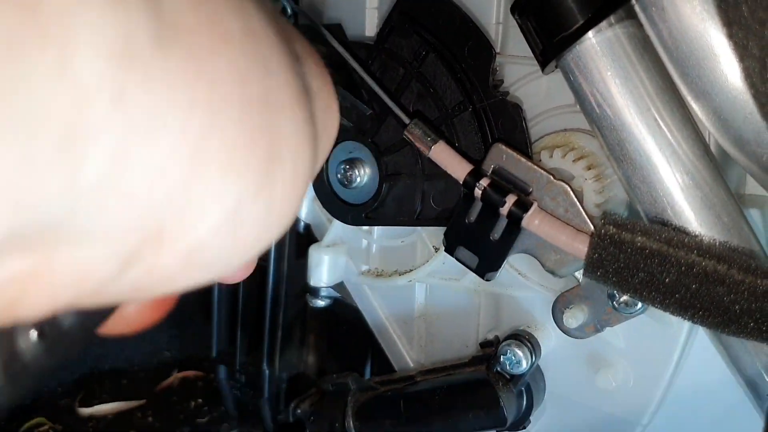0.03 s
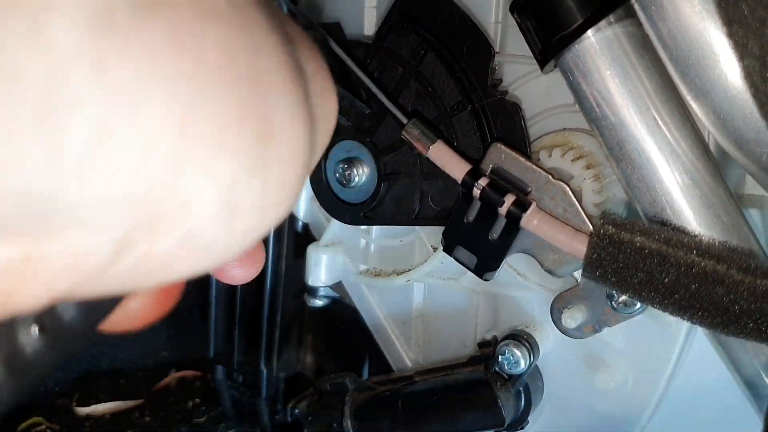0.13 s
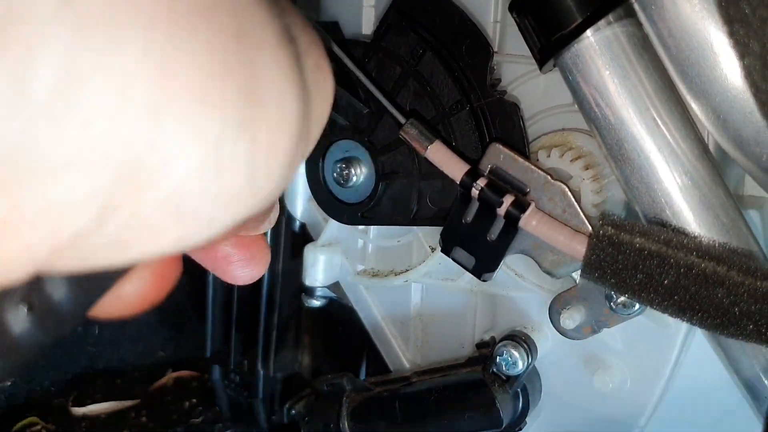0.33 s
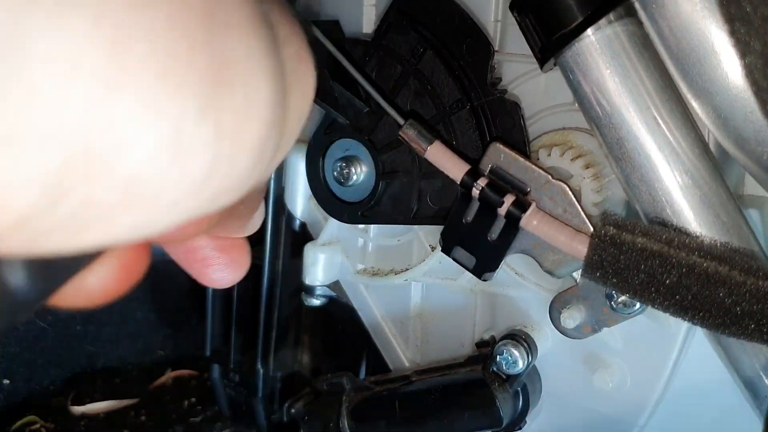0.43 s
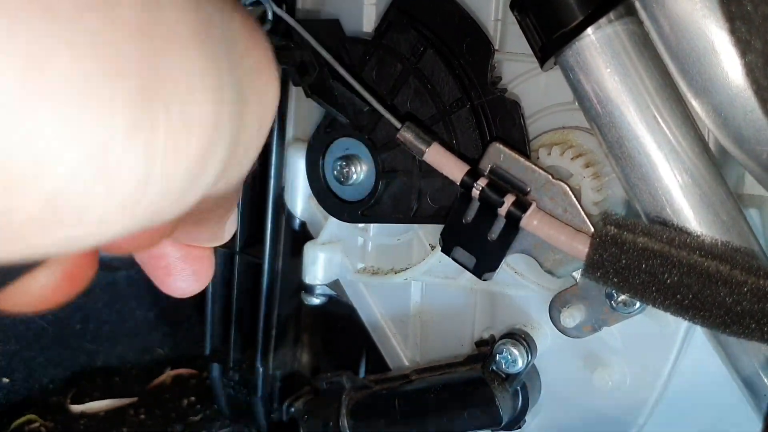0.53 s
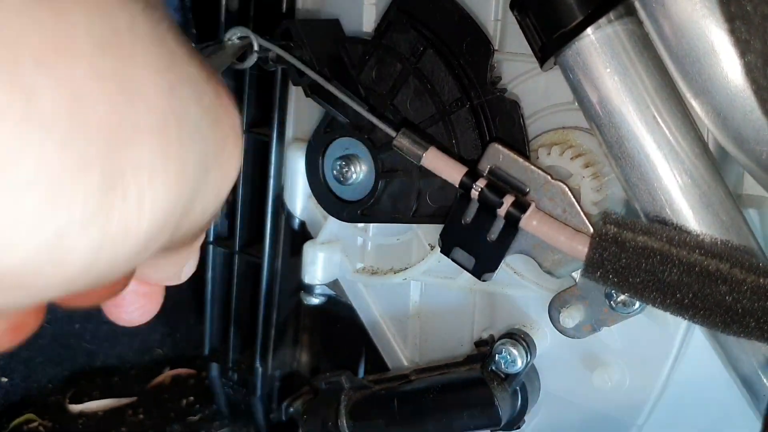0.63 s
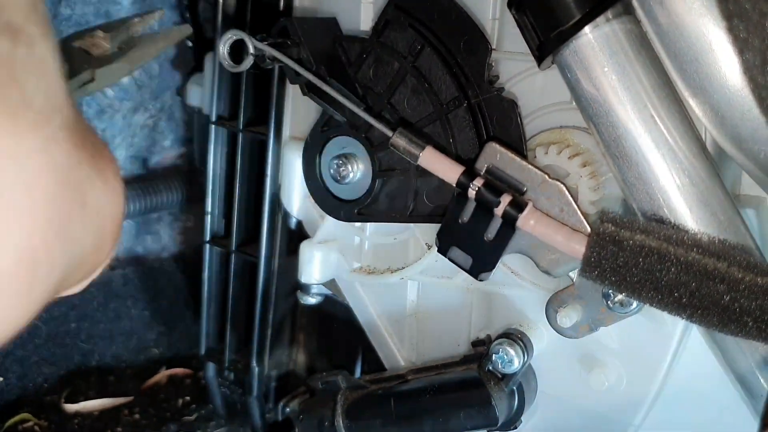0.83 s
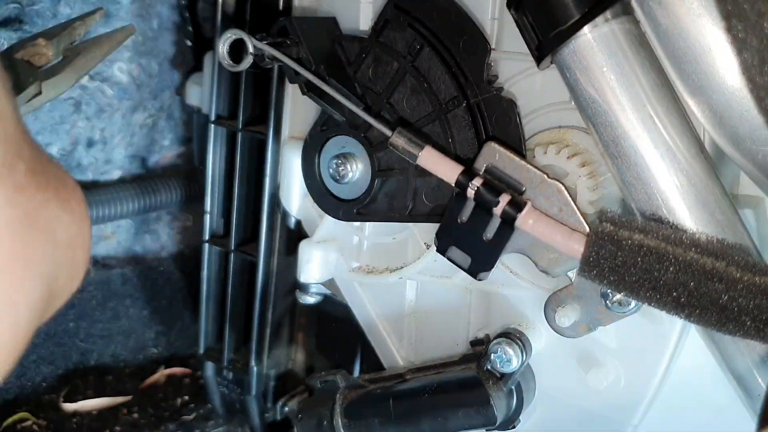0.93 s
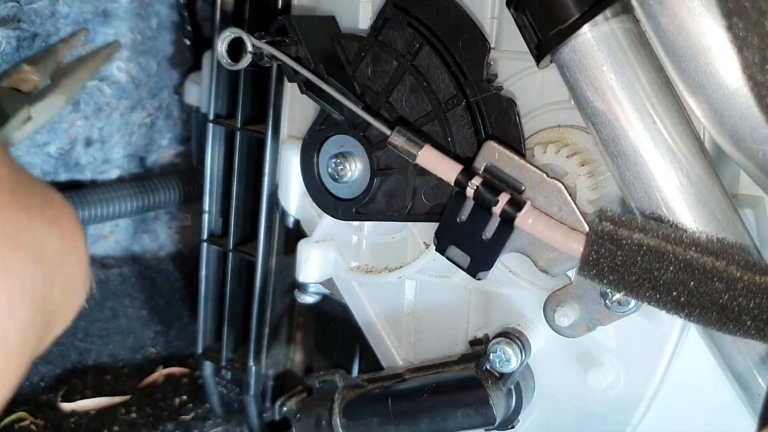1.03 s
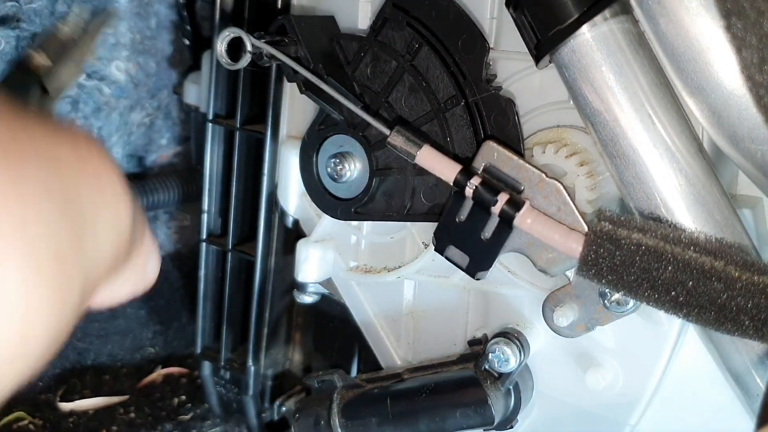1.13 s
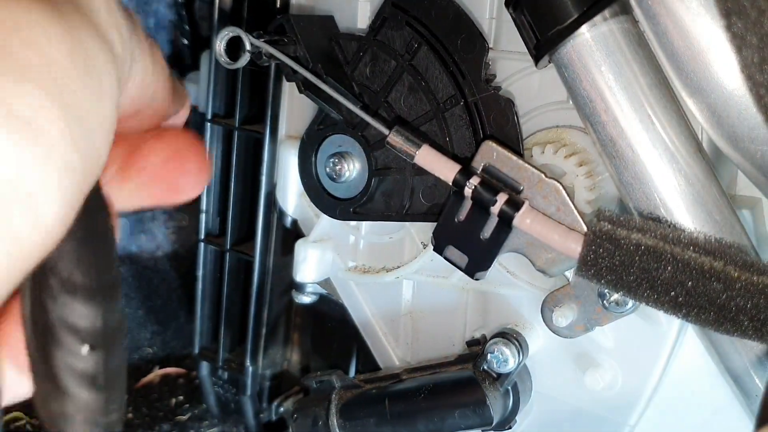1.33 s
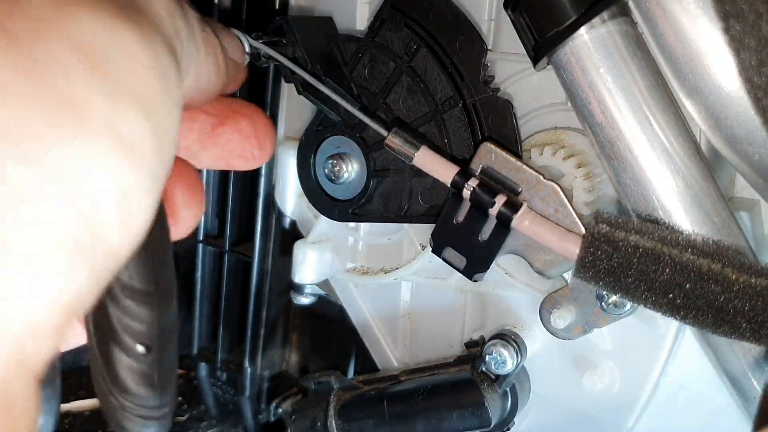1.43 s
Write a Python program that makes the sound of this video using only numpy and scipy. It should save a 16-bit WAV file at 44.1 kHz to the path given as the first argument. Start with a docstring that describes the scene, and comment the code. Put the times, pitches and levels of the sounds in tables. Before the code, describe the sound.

Close up inside a small, quiet car, pliers click sharply on a steel cable, rub softly along a panel, and the freed cable end chatters against hollow plastic. Faint ticks and a low hand rumble accompany the work.

```python
"""Pliers on a car door cable

Inside a small, dead car cabin, stereo microphone close to the door. Pliers work a thin steel cable
off a lever: the jaws slip with a sharp snap, something rubs along the panel, then the cable end comes
free and rattles on plastic. Snap and rattle ring the panel; the hand adds faint ticks and a low rumble."""
import sys
import numpy as np
from scipy import signal
from scipy.fft import rfft, irfft
from scipy.io import wavfile
from scipy.ndimage import uniform_filter1d

SR = 44100
rng = np.random.default_rng(int(sys.argv[2]) if len(sys.argv) > 2 else 0)


def materialize(psi):
    """Save the field psi as 16-bit PCM at rate SR to the path in sys.argv[1].

    A 1-D psi becomes a single channel; in a 2-D psi each row is a channel.
    """
    bounded = np.clip(np.atleast_2d(psi).T, -1, 1)
    quanta = np.round(bounded * 32767).astype(np.int16)
    wavfile.write(sys.argv[1], SR, quanta)


N = 66150

# balance of the two microphone ports (frequency [Hz], left minus right [dB])
MIC_BALANCE = [(100, 2), (350, 2.5), (600, -2), (1200, 0.5), (1900, 1.5), (2600, 7), (4500, 7),
               (9000, 11.5), (12500, 5.5), (15000, 5)]
# spectra of the steady and sliding noises (frequency [Hz], relative level [dB])
HUSH_COLOUR = [(100, 10), (300, 4.5), (700, -0.5), (2000, -3.5), (6000, -10.5), (10000, -11),
               (14000, -12.5), (16000, -24)]
RUMBLE_COLOUR = [(20, -11.5), (42, -1.5), (70, 0), (100, -0.5), (135, -10), (200, -16.5), (300, -31),
                 (600, -48), (2000, -75)]
RUB_BODY_COLOUR = [(150, -4), (300, -5.5), (480, -1), (680, 1), (900, -6), (1130, 1.5), (1380, -10.5),
                   (1570, -5), (1850, -9), (2200, 2), (2650, -5.5), (3050, -3.5), (3600, -12.5),
                   (4800, -9.5), (6200, -25), (16000, -50)]
RUB_TREBLE_COLOUR = [(1500, -25), (4000, -6), (5200, 0), (7000, -3), (8200, -1), (10500, -5), (13000, -5.5),
                     (16000, -28)]
QUIVER_COLOUR = [(300, -17), (1200, -14), (1800, 3.5), (2300, -9), (3100, -1), (4200, -9), (5400, -5.5),
                 (7000, -26), (16000, -41)]
# spectra of the contacts (frequency [Hz], relative level [dB])
BUMP_COLOUR = [(80, 0), (250, -1.5), (600, 0.5), (1200, -14), (3000, -24), (16000, -48.5)]
TICK_COLOUR = [(150, -12), (700, -2), (1500, 0.5), (3200, -1), (6000, -13), (11000, -25.5), (16000, -46)]
RATTLE_COLOUR = [(40, -37), (90, -14.5), (155, -1.5), (220, -5.5), (350, 4.5), (680, -5.5), (830, 1.5),
                 (1100, -3.5), (1300, -1), (1750, -3), (3000, -3), (3900, -9), (4900, -9), (7000, -16.5),
                 (9700, -17.5), (13700, -24.5), (15500, -52)]
SNAP_COLOUR = [(40, -44.5), (90, -22), (165, -12), (240, -17), (330, -1), (440, -5.5), (580, 3.5),
               (900, -1), (1500, -5.5), (1900, -2), (2400, -6.5), (3000, -1), (5000, -10), (7500, -10),
               (9600, -5), (11500, -12.5), (13700, -14), (15500, -38)]
# handling rumble (time [s], relative level [dB])
RUMBLE_LEVELS = [(0.0, -56), (0.09, -51.5), (0.116, -64), (0.142, -52), (0.196, -54.5), (0.22, -46),
                 (0.254, -45.5), (0.316, -58.5), (0.466, -43), (0.488, -56), (0.518, -46), (0.604, -52.5),
                 (0.622, -65), (0.692, -66), (0.714, -56.5), (0.792, -37.5), (0.86, -55), (0.93, -64),
                 (1.076, -63.5), (1.102, -57.5), (1.132, -65.5), (1.42, -66.5), (1.454, -61), (1.5, -62.5)]
# hand and pliers nudging the door (time [s], frequency [Hz], level before filtering [dB], t60 [s])
THUDS = [(0.232, 67.87, -50.5, 0.18), (0.412, 107, -38.5, 0.033), (0.447, 93.3, -31, 0.077),
         (0.783, 80.5, -33, 0.12)]
# rubbing along the panel (time [s], relative body level [dB], treble level [dB])
RUB_LEVELS = [(0, -86.5, -97), (0.18, -77.5, -78.5), (0.28, -66, -74), (0.36, -72.5, -81),
              (0.393, -73, -76.5), (0.402, -58.5, -66), (0.418, -54.5, -71), (0.44, -57.5, -74),
              (0.48, -54, -75), (0.53, -59, -67), (0.59, -59, -68.5), (0.655, -66, -73.5),
              (0.71, -61.5, -75), (0.82, -68, -70), (0.88, -76.5, -76), (0.97, -91, -79), (1.06, -93, -102),
              (1.38, -94, -100), (1.44, -82, -94), (1.5, -84, -91)]
# door resonances under the rubbing (frequency [Hz], width [Hz], relative level [dB])
RUB_RESONANCES = [(530, 47, -2), (700, 97, -1), (1130, 110, -2), (1600, 60, -8), (2202, 150, -1.5),
                  (3000, 90, -5.5), (4780, 150, -9), (8100, 250, -18)]
# panel and lever modes (frequency [Hz], relative level [dB], t60 [s], left minus right [dB], right lag [ms])
PANEL_MODES = [(176, -20.5, 0.2, 3, 0.0027), (313, -10, .08, 2, 0), (343.5, -8, 0.066, 4.5, 0.17),
               (536.2, -3, 0.039, -5, 0.0036), (586.2, -1, 0.048, -2, 0), (753, -9.5, .07, -2, 0),
               (926, -4.5, .04, 3, .05), (1230.3, -6, 0.045, 0, 0.2), (1565, -11, .04, 0, 0.28),
               (1940, -2, 0.022, -7, .1), (2988, -5.5, 0.033, 8, .1)]
# steel jaw modes (frequency [Hz], relative level [dB], t60 [s])
JAW_MODES = [(2830, -6, .02), (3580, -7.5, 0.039), (7470, -8.5, .028), (9840, -3.5, 0.031), (9300, 0, .022),
             (13000, -9, .018)]
# fingertip bumps, and jaws ticking on the cable (time [s], relative level [dB], brightness [dB/octave])
FINGER_BUMPS = [(0.074, -4, -3), (0.124, 0, 0), (1.421, -17, 8)]
JAW_TICKS = [(0.061, -21, 0.5), (0.083, -23.5, 2.5), (0.124, -27, 2), (0.146, -17.5, 0.5), (0.164, -29, 5),
             (0.183, -17.5, 3.5), (0.2498, 3.5, 0.5), (0.307, -13, -12), (0.3175, -8.5, -1.5),
             (0.334, -13, -8), (0.351, -10, -3), (0.356, -14.5, -5), (0.398, -11.5, 2), (0.514, -7, 2)]
# cable end striking the lever, and jaws snapping and rebounding
# (time [s], relative level [dB], brightness [dB/octave], relative panel ring [dB])
CABLE_STRIKES = [(0.7184, -6, 0, -4), (0.7226, -5.5, -2.5, -8.5), (0.7457, -2, -1.5, -31),
                 (0.7470, 1.5, 0.76, 0), (0.7550, 1, -0.24, 2), (0.7575, -4, -0.5, -4.5),
                 (0.7605, -11, 1.5, -3), (0.7655, -5.5, 1, -14.5), (0.7700, -10.5, -4, -9.5),
                 (0.7745, -10, -0.5, -9.5), (0.7842, -18.5, -0.2, -9), (0.7885, -13, -1.3, -9),
                 (0.7935, -20.5, -2, -19), (0.7975, -12.5, 1.2, -17.5), (0.8035, -18, -1.5, -15),
                 (0.8462, -35.5, 5.5, -43)]
JAW_SNAPS = [(0.2159, 0, 0.5, -3), (0.2165, -0.5, 0, -9), (0.2195, -9, 0.5, -3), (0.2213, -7, -1.5, -0.5)]

TIME = np.arange(N) / SR
BIN_HZ = np.maximum(np.arange(N // 2 + 1) * SR / N, 1)


def undb(db):
    """Decibels to gain."""
    return 10 ** (np.asarray(db) / 20)


def sides(db):
    """Left and right gains for a level difference."""
    gains = undb(np.array([[db], [-db]]) / 2)
    return gains / np.sqrt(np.mean(gains ** 2))


def spectrum_db(points):
    """Read (frequency [Hz], level [dB]) points at every bin, on a log-frequency axis."""
    hz, db = np.array(points, float).T
    return np.interp(np.log(BIN_HZ), np.log(hz), db)


def envelope(rows, column=1):
    """Gain over time from one dB column of a table."""
    points = np.array(rows, float)
    return undb(np.interp(TIME, points[:, 0], points[:, column]))


def fade(age, t60):
    """Exponential decay, 60 dB down after t60 seconds."""
    return np.exp(-np.minimum(np.log(1000) * age / max(t60, 1e-3), 40))


def ring(start, hz, t60):
    """One struck mode."""
    age = np.maximum(TIME - start, 0)
    return np.sin(2 * np.pi * hz * age) * fade(age, t60)


def hiss(bass_width=0.3):
    """White noise at the two microphone ports: alike in the bass, unrelated in the treble."""
    mid, side = rfft(rng.standard_normal((2, N)))
    width = np.clip(bass_width + (BIN_HZ / 1046) ** 2 / 2, 0, 1)
    return irfft((mid + np.array([[1], [-1]]) * width * side) / np.hypot(1, width), N)


def tint(sound, colour):
    """Causal filter of unit power with the given colour and the microphone's balance."""
    pan = undb(np.array([[1], [-1]]) * spectrum_db(MIC_BALANCE) / 2)
    gain = pan / np.hypot(*pan) * undb(spectrum_db(colour))
    cepstrum = irfft(np.log(gain / np.sqrt(np.mean(gain ** 2))), N)
    cepstrum[:, 1:N // 2] *= 2  # minimum phase keeps attacks sharp
    cepstrum[:, N // 2 + 1:] = 0
    impulse = irfft(np.exp(rfft(cepstrum)), N)[:, :N // 8]
    return signal.fftconvolve(sound, impulse, axes=1)[:, :N]


def noise(colour, bass_width=0.3):
    """Coloured stereo noise of rms about 1."""
    return tint(hiss(bass_width), colour)


def contacts(hits, colour, db, t60, shorten, cabin_db, cabin_t60):
    """Dense, damped ringing of each hit with a short cabin tail; t60s hold at 1 kHz and shorten upward."""
    source = rfft(hiss())
    ringing = np.zeros((2, N))
    age = TIME[:N // 4]
    bin_octave = np.clip(np.log2(BIN_HZ / 1000), -3, 4)
    for octave in range(-3, 5):
        scale = 2 ** (-shorten * octave)
        decay = fade(age, t60 * scale) ** 2 + (undb(cabin_db) * fade(age, cabin_t60 * scale)) ** 2
        power = np.zeros(2 * N)
        for start, hit_db, tilt_db, *_ in hits:
            onset = int(start * SR)
            power[onset:onset + len(age)] += decay * undb(hit_db + tilt_db * octave) ** 2
        band = irfft(source * np.maximum(1 - abs(bin_octave - octave), 0), N)
        ringing += np.sqrt(power[:N]) * band
    return undb(db) * tint(ringing, colour)


def cabin_hush():
    """Room tone of the cabin, far below everything else."""
    return undb(-81) * noise(HUSH_COLOUR)


def handling():
    """Low rumble, soft thuds and fingertip bumps of the hand working near the microphone."""
    thuds = sum(undb(db) * ring(start, hz, t60) for start, hz, db, t60 in THUDS)
    thuds = signal.sosfilt(signal.butter(2, (36, 270), "band", fs=SR, output="sos"), thuds)
    rumble = undb(-1.5) * envelope(RUMBLE_LEVELS) * noise(RUMBLE_COLOUR, bass_width=0.27)
    bumps = contacts(FINGER_BUMPS, BUMP_COLOUR, db=-58, t60=0.12, shorten=0.5,
                     cabin_db=-20, cabin_t60=0.34)
    return rumble + thuds + bumps


def rubbing():
    """Soft sliding friction, broken into tiny grains, rings narrow resonances of the door."""
    grain_db, grain_samples = 1.5, int(0.0014 * SR)
    roughness = np.sqrt(grain_samples) * uniform_filter1d(rng.standard_normal(N), grain_samples)
    hz = np.geomspace(50, 16000, num=600)
    peak_power = sum(undb(db) ** 2 / (1 + ((hz - centre) / width) ** 2) ** 2
                     for centre, width, db in RUB_RESONANCES)
    peak_colour = np.column_stack([hz, 10 * np.log10(peak_power)])
    body = undb(-3.5) * noise(RUB_BODY_COLOUR) + undb(-2) * noise(peak_colour)
    treble = envelope(RUB_LEVELS, column=2) * noise(RUB_TREBLE_COLOUR)
    return undb(grain_db * roughness) * (envelope(RUB_LEVELS) * body + treble)


def door_panel(hits, db):
    """Every blow rings the same hollow panel modes, which radiate little bass."""
    blows = np.zeros(N)
    for start, _, _, ring_db in hits:
        blows[int(start * SR)] += undb(ring_db + db)
    body = np.zeros((2, N))
    for hz, mode_db, t60, pan_db, lag_ms in PANEL_MODES:
        mode = np.array([ring(0, hz, t60), ring(lag_ms / 1000, hz, t60)])
        body += undb(mode_db) * sides(pan_db) * mode
    body = signal.sosfilt(signal.butter(2, 248, "high", fs=SR, output="sos"), body)
    return signal.fftconvolve(body, blows[None], axes=1)[:, :N]


def cable():
    """The cable drags briefly on the lever, lets go, chatters against it and is left quivering."""
    drag_start_s, drag_peak_s, quiver_span_s = 0.6825, 0.6856, (0.9, 1.13)
    strain = np.interp(TIME, [drag_start_s, drag_peak_s], [0, 1])
    release = fade(np.maximum(TIME - drag_peak_s, 0), t60=0.15)
    drag = undb(-51.5) * strain * release * noise([(150, -20), (600, 0), (1200, -16), (6000, -45)])
    quiver = undb(-73.6) * np.interp(TIME, quiver_span_s, [1, 0], left=0) * noise(QUIVER_COLOUR)
    rattle = contacts(CABLE_STRIKES, RATTLE_COLOUR, db=-20.5, t60=0.022, shorten=0.2725,
                      cabin_db=-14, cabin_t60=0.0659)
    return drag + quiver + rattle + door_panel(CABLE_STRIKES, db=-29.5)


def pliers():
    """The jaws tick as they grip, and slip with a crack, a brief steel ring and a knock in the panel."""
    crack = contacts(JAW_SNAPS, SNAP_COLOUR, db=-14, t60=0.0277, shorten=0.3958,
                     cabin_db=-23.5, cabin_t60=0.1231)
    slip_s = JAW_SNAPS[0][0]
    steel = sum(undb(db) * ring(slip_s, hz, t60) for hz, db, t60 in JAW_MODES)
    steel = undb(-19.5) * sides(11) * steel  # left of the microphone
    ticks = contacts(JAW_TICKS, TICK_COLOUR, db=-40, t60=0.0064, shorten=0.07,
                     cabin_db=-22.5, cabin_t60=0.02)
    return crack + steel + door_panel(JAW_SNAPS, db=-23) + ticks


def scene():
    """Close work on the door over the hush of the cabin."""
    return pliers() + cable() + rubbing() + handling() + cabin_hush()


def record(dry):
    """The recorder cuts the top steeply above 15 kHz."""
    return signal.sosfilt(signal.ellip(8, 0.2, 80, 15000, fs=SR, output="sos"), dry)


dry = scene()
out = record(dry)
materialize(out)
```